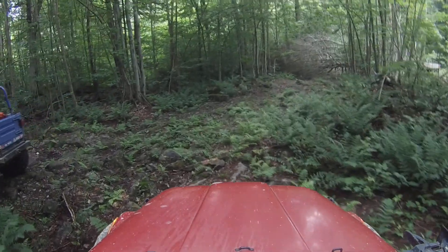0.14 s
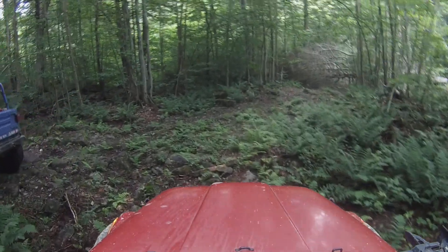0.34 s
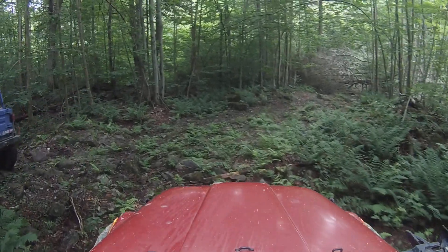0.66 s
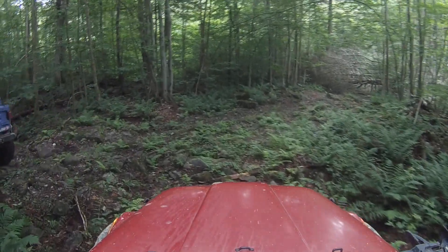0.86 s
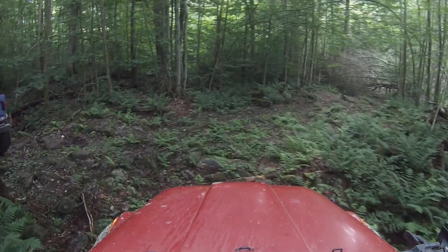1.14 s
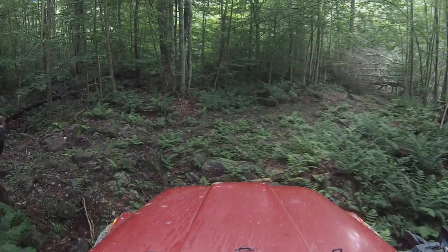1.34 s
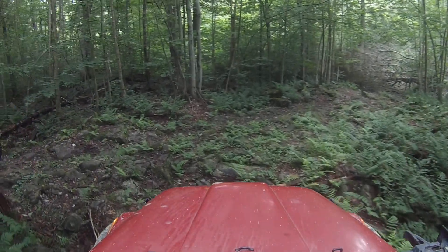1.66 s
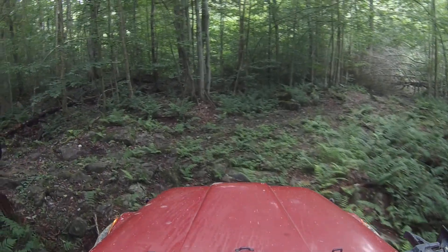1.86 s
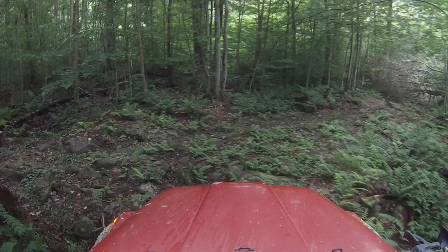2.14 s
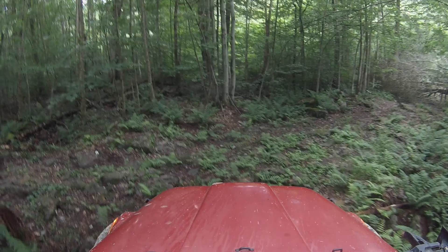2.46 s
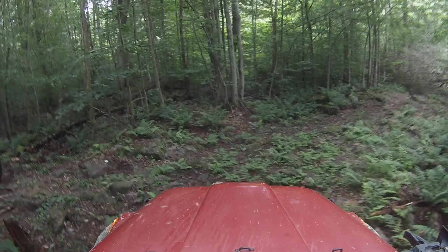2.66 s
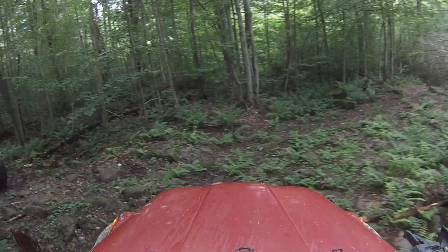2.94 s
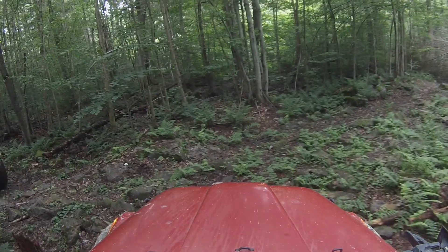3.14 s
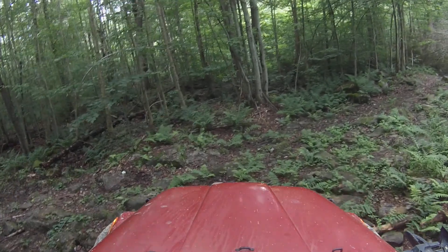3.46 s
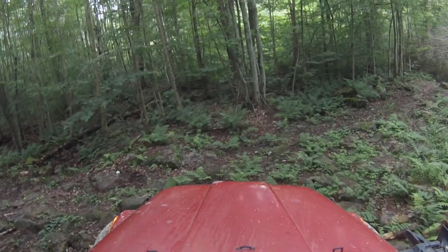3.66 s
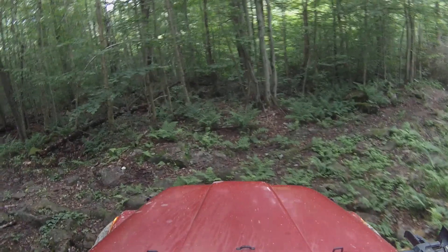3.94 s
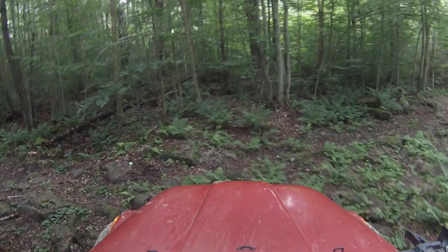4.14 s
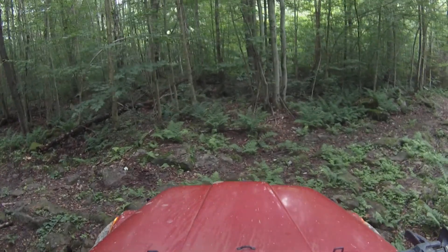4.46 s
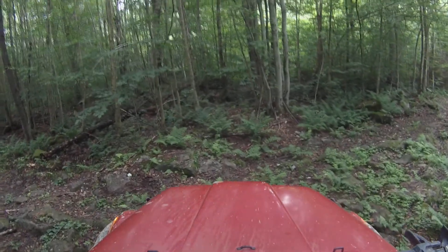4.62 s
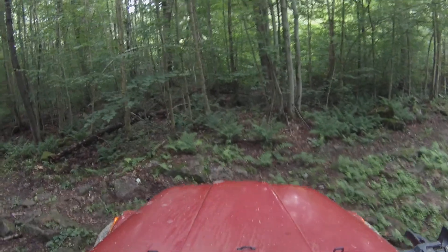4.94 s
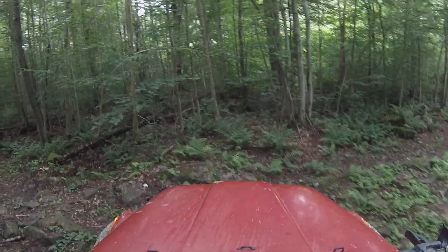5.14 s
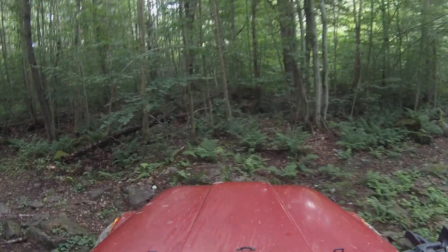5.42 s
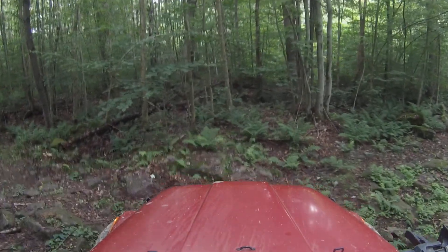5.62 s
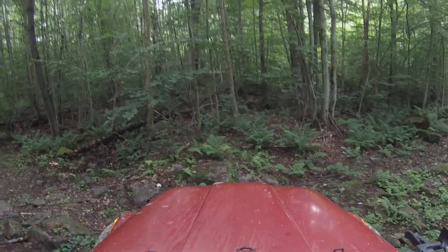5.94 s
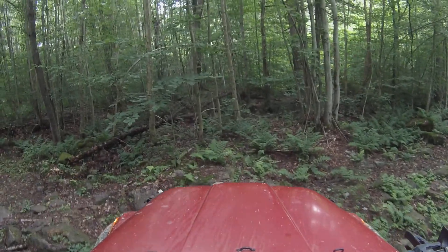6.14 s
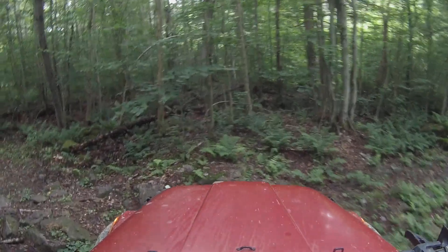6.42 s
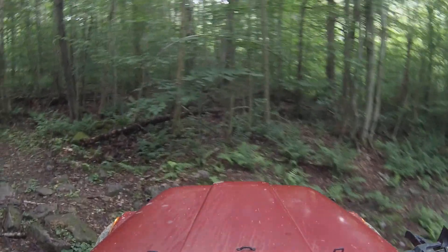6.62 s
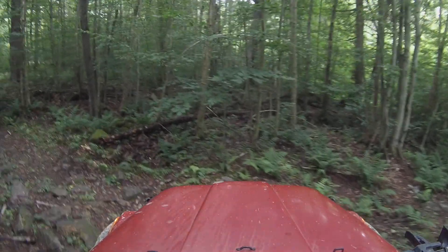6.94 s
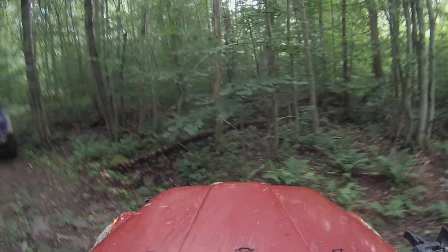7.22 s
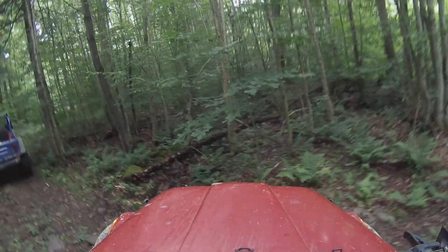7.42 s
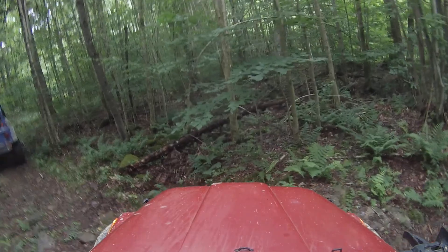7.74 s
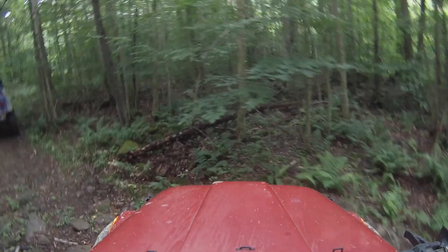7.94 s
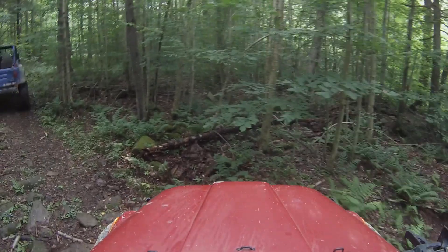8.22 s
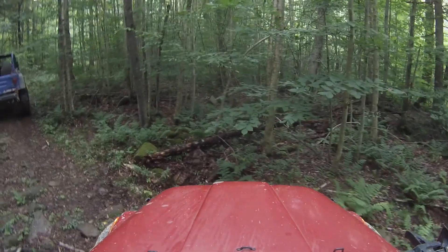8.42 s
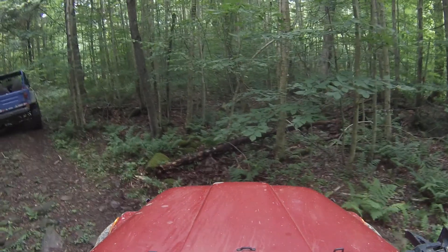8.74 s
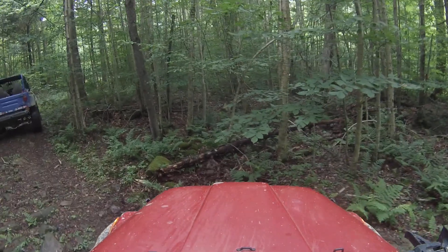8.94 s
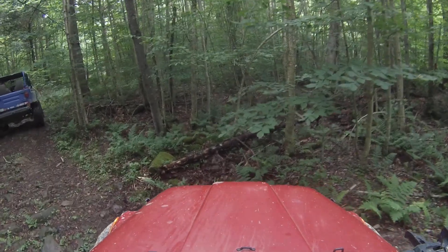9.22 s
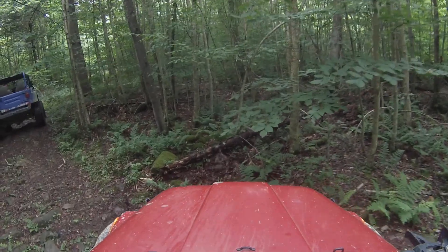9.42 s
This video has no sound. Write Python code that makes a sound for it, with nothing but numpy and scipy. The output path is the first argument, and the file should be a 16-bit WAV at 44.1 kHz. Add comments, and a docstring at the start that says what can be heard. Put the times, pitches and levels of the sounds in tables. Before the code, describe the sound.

An off-road vehicle crawls along a rough forest trail, its engine a low, uneven throb. The microphone rides on the vehicle inside a plastic housing that knocks and rattles hollowly throughout. About halfway, bumps swell into a heavy rumble and the suspension thuds twice. Scrapes and a brief squeak follow, then another cluster of jolts near the end, with tiny metal ticks over a faint hiss.

```python
"""Off-road crawl on a forest trail.

An off-road vehicle crawls over rough ground, heard by a camera shut in a plastic housing on the
windscreen frame. The engine's firing throbs through the frame; bumps shake the body into a low rumble
and the suspension bottoms out. The camera knocks, scrapes and squeaks against its housing and loose
metal ticks. A low hum comes and goes, and two faint forest calls sit in a soft hiss."""
import sys
import numpy as np
from scipy import signal
from scipy.fft import rfft, irfft, next_fast_len
from scipy.io import wavfile

SR = 44100
rng = np.random.default_rng(int(sys.argv[2]) if len(sys.argv) > 2 else 0)


def master(y):
    """Save y as 16-bit WAV."""
    cut = np.clip(np.atleast_2d(y).T, -1, 1)
    pcm = np.round(cut * 32767)  # scale
    wavfile.write(sys.argv[1], SR, pcm.astype(np.int16))


N = 422037


def gain_of(db):
    """Decibels to gain."""
    return 10 ** (np.asarray(db) / 20)


def unit_rms(x):
    """Normalises to rms 1."""
    return x / np.sqrt(np.mean(x ** 2) + 1e-20)


def unit_peak(x):
    """Normalises to peak 1."""
    return x / abs(x).max()


def add(mix, start, sound):
    """Drops a sound into the mix at start seconds."""
    part = mix[round(start * SR):][:len(sound)]
    part += sound[:len(part)]


def automation(table, column):
    """Straight ramps through one column of a timed table."""
    columns = np.transpose(table)
    return np.interp(np.arange(N) / SR, columns[0], columns[column])


def lowpass(x, hz):
    """Rolls off the top above hz."""
    return signal.sosfilt(signal.butter(2, hz, fs=SR, output="sos"), x)


def resonate(x, hz, width):
    """A resonance of gain 1 at its centre."""
    return signal.lfilter(*signal.iirpeak(hz, hz / max(width, 10), SR), x)


def wander(hz):
    """Random drift of rms 1, mostly slower than hz."""
    return unit_rms(lowpass(rng.standard_normal(N), hz))


def shaped_noise(spectrum):
    """Noise of rms 1 with the given spectrum, silent outside it."""
    points_hz, db = np.transpose(spectrum)
    size = next_fast_len(N)
    hz = np.fft.rfftfreq(size, 1 / SR)
    shape = gain_of(np.interp(np.log(hz + 1), np.log(points_hz + 1), db, -120, -120))
    return unit_rms(irfft(rfft(rng.standard_normal(size)) * shape, size)[:N])


# Engine firing rate and level: t/s, f/Hz, level/dB
FIRING = [(0.0, 39.76, -26.5), (0.67, 43.4, -22.5), (0.98, 34.34, -26.5), (1.62, 42.87, -24.5),
          (2.05, 38.48, -22.5), (2.53, 43.05, -25), (4.05, 34.27, -18.5), (4.32, 39.5, -23),
          (4.58, 29.67, -25), (5.06, 41.63, -19), (5.73, 41.33, -24), (6.32, 51.26, -24),
          (6.61, 38.27, -18), (7.81, 46.38, -28.5), (8.15, 35.07, -22), (8.53, 37.58, -27.5),
          (9.57, 28.83, -21)]
# Trail roughness, as shake of the body: t/s, level/dB
ROUGHNESS = [(0.0, -34), (1.5, -34), (3.2, -34), (5.1, -28.5), (6.9, -30), (8.5, -34), (9.57, -30)]
CALM_DB = -32  # shake on an ordinary stretch


def engine():
    """The firing tone; uneven cylinders make it throb a few times a second, more on rough ground."""
    firing_hz = automation(FIRING, column=1) * (1 + 0.03753 * wander(hz=4.3))
    phase = 2 * np.pi * np.cumsum(firing_hz) / SR
    depth = .46 * gain_of(.5 * (automation(ROUGHNESS, column=1) - CALM_DB))
    throb = 1 + depth * unit_rms(resonate(wander(hz=20), hz=6, width=9))
    return np.sqrt(2) * gain_of(automation(FIRING, column=2)) * throb * np.sin(phase)


# Wheels meet a root or stone: t/s, hold/s, level/dB
BUMPS = [(0.845, 0.054, -32), (3.543, 0.045, -22.5), (4.087, 0.013, -21), (4.49, 0.096, -19),
         (4.916, 0.0083, -17.5), (6.113, 0.048, -26), (7.709, 0.015, -27), (7.883, 0.033, -21),
         (8.045, 0.031, -22)]
CLIMB_DB_PER_S, SETTLE_DB_PER_S = 101.5, 91.5


def shaking():
    """Shake in dB: over the trail's roughness, bumps build as a wheel climbs and die as springs settle."""
    t = np.arange(N) / SR
    power = gain_of(2 * automation(ROUGHNESS, column=1))
    for start, hold, db in BUMPS:
        climb_db = CLIMB_DB_PER_S * np.maximum(start - t, 0)
        settle_db = SETTLE_DB_PER_S * np.maximum(t - start - hold, 0)
        power += gain_of(2 * (db - climb_db - settle_db))
    return 10 * np.log10(power)


# Tone curve of the body rumble: f/Hz, relative level/dB
RUMBLE_EQ = [(15, -21.5), (30, -0.5), (60, -12), (90, -15), (130, -11.5), (220, -14.5), (290, -25.5),
             (400, -66.5)]


def body_rumble():
    """Springs, axles and panels rumble in lumps; the body heaves and hard bumps boom in the chassis."""
    shake_db = shaking()
    boom = unit_rms(resonate(wander(hz=205), hz=87.3, width=55))
    boom *= gain_of(.5 * (shake_db - CALM_DB) - 8)
    sway = resonate(wander(hz=78), hz=28, width=18)
    heave = gain_of(-6) * unit_rms(resonate(sway, hz=28, width=18))
    lumps = gain_of(2 * wander(hz=6.2))
    return gain_of(shake_db) * lumps * (shaped_noise(RUMBLE_EQ) + boom + heave)


# Tone curve of the hiss: f/Hz, relative level/dB
HISS_EQ = [(1500, -23), (2400, 4.5), (3000, -4.5), (4500, -5.5), (7000, -10), (8300, -13.5), (11500, -15.5),
           (13000, -22), (15500, -32.5)]


def hiss():
    """A thin, flickering bed of air and electronics."""
    return gain_of(-64.5 + 1.4 * wander(hz=13)) * shaped_noise(HISS_EQ)


# Resonances of the plastic housing: f/Hz, width/Hz, level/dB
HOUSING_MODES = [(225.6, 39, 2.5), (394.7, 57, 2), (466, 29.7, 6), (537.4, 78, -5.5), (834, 111, -6),
                 (1055, 156, -14), (1385, 198, -11.5), (1958, 180, -13), (2134, 337, -16.5),
                 (2596, 182, -19.5), (3154, 100, -29.5), (3523, 370, -33.5), (5220, 210, -45),
                 (6460, 560, -48)]
HOLLOW = np.array([hz < 600 for hz, _, _ in HOUSING_MODES])[:, None]  # the whole housing rings


def ring_housing(force):
    """Each mode rings to its own row of force, dulled by the soft plastic-on-plastic contact."""
    return np.array([(-1) ** k * gain_of(db) * resonate(lowpass(force[k], 1.114 * hz), hz, width)
                     for k, (hz, width, db) in enumerate(HOUSING_MODES)])


def housing_noise():
    """Small random rattles, the buzz of the frame and scrapes all ring the housing."""
    shake_db = shaking() - CALM_DB
    struck = rng.random(N) < 15 / SR  # about 15 rattles a second
    accent_db = 3 * np.minimum(rng.exponential(1, N), 1.5)
    hits = struck * gain_of(accent_db + 0.36 * shake_db - 20.5)
    rattle = signal.oaconvolve(hits, np.exp(-np.arange(2048) / SR / .0035))[:N]
    buzz = gain_of(-29 + 0.73 * shake_db) * gain_of(3.15 * HOLLOW)  # the frame drives low modes best
    force = (rattle + buzz + scrape_force()) * rng.standard_normal(N)
    return ring_housing(force).sum(0)


# The camera drags against its housing: t/s, length/s, force/dB
SCRAPES = [(0.03, 0.1, -19), (0.193, 0.027, -9), (0.225, 0.034, -8), (0.913, 0.054, -18),
           (3.291, 0.085, -19), (3.587, 0.054, -12), (3.986, 0.16, -23), (4.399, .024, -10),
           (4.601, 0.018, -10), (5.165, 0.078, -14.5), (5.291, 0.052, -11), (5.406, 0.044, -12),
           (6.084, 0.073, -8), (6.308, 0.022, -3), (6.478, 0.09, -11), (6.597, 0.12, -9.5),
           (6.941, 0.038, -11), (7.031, 0.1, -11), (7.171, 0.18, -23), (7.408, 0.071, -12.5),
           (7.486, 0.12, -15.5), (7.774, 0.097, -16.5), (7.919, 0.12, -17), (8.025, 0.15, -17),
           (8.136, 0.047, -9), (8.238, 0.04, -5)]


def scrape_force():
    """Stick-slip: separate uneven slips over a thin rasp, pushing the bright modes hardest."""
    drag = np.zeros(N)
    for start, length, db in SCRAPES:
        add(drag, start, gain_of(db) * signal.windows.tukey(round(length * SR), .75))
    tilt = gain_of(1.7 * np.log2([[hz / 2000] for hz, _, _ in HOUSING_MODES]))
    slip_hz = 90 * gain_of(3 * wander(hz=40))
    slips = np.diff(np.floor(np.cumsum(slip_hz) / SR), prepend=0)
    slips *= gain_of(3 * rng.standard_normal(N))
    slips = signal.lfilter([1], [1, -np.exp(-1 / SR / .004)], slips)  # 4 ms tail on each
    return tilt * drag * (.6 + slips) * gain_of(3 * wander(hz=35))


def blow(decay_s, contact=3.0):
    """The force of a hit: one sharp contact, then a dying burst of chatter."""
    t = np.arange(2048) / SR
    attack = 1 - np.exp(-t / (0.4 * decay_s))
    decay = np.exp(-(t / decay_s) ** 1.4) + 0.19 * np.exp(-t / (4 * decay_s))
    force = rng.standard_normal(2048) * decay * attack
    force[20] += contact
    return force * np.sqrt(SR * decay_s / 2) / np.linalg.norm(force)


# The camera knocks in its housing: t/s, clack peak/dB, hollow rms against that peak/dB
KNOCKS = [(0.071, -28, -2.5), (0.143, -29, -2), (0.167, -30, -7), (0.191, -23, -11), (0.228, -23, -6),
          (0.412, -27.5, -10), (0.458, -27, -4), (0.482, -26, -21), (0.552, -24.5, -7.5),
          (0.808, -24, -6.5), (0.839, -29.5, -4), (0.873, -31.5, -10), (1.002, -23, -10.5),
          (1.173, -32, -9), (1.241, -22.5, -22), (1.454, -30, 0.5), (1.551, -32, -2), (1.574, -32, 1),
          (1.664, -27, -0.5), (1.738, -28, 2.5), (1.98, -31, -1), (2.053, -32, -7), (2.17, -32, -18),
          (2.302, -28, -15), (2.328, -29, -7.5), (3.186, -24.5, -32), (3.24, -33, -6), (3.307, -27, -7.5),
          (3.434, -24, -5.5), (3.502, -24, -8), (3.579, -23, -1.5), (3.959, -27, -0.5), (4.043, -30.5, 2),
          (4.089, -16, -9.5), (4.161, -25.5, -4), (4.373, -26, -6), (4.445, -22, -11), (4.484, -17.5, -7),
          (4.524, -20, -7), (4.564, -25, -5.5), (4.827, -28.5, -0.5), (4.898, -30, 4), (5.003, -19.5, -5.5),
          (5.284, -24.5, -6), (5.403, -23.5, -6), (5.672, -30, -22), (5.709, -24, -21), (5.841, -23.5, -7),
          (5.877, -29.5, 1), (5.936, -27, -9), (5.954, -22.5, -7), (5.996, -28.5, -10), (6.029, -28, -4),
          (6.048, -26.5, -7), (6.303, -15.5, -4.5), (6.507, -25, -7), (7.173, -30.5, -5),
          (7.481, -31.5, -1), (7.527, -23, -3), (7.672, -29, -11), (7.867, -17, 2.5), (8.018, -16.5, -4),
          (8.07, -24.5, -8.5), (8.128, -21.5, -15), (8.392, -30, -36), (8.865, -32.5, 1),
          (8.928, -21, -12.5), (8.967, -28.5, -3), (9.005, -29.5, -1), (9.034, -23.5, -5), (9.152, -38, -2),
          (9.441, -25.5, -10.5), (9.469, -27.5, -4.5)]
# Further light knocks of the camera in its housing, all at one common level: t/s
LIGHT_KNOCKS = [1.382, 1.785, 2.096, 2.189, 2.817, 2.885, 5.764, 5.803, 6.743, 7.345, 7.638, 7.75, 7.775,
                8.211, 8.568, 8.734, 8.772, 8.9, 9.082, 9.176, 9.349, 9.411]
LIGHT_KNOCK_DB, LIGHT_KNOCK_HOLLOW_DB = -35.5, -8


def knocks():
    """Each hit rings the housing: a clack on top, and a hollow tone mostly from the first contact."""
    out = np.zeros(N)
    modes = ring_housing(np.tile(signal.unit_impulse(3000), (len(HOUSING_MODES), 1)))
    light_knocks = [(start, LIGHT_KNOCK_DB, LIGHT_KNOCK_HOLLOW_DB) for start in LIGHT_KNOCKS]
    for start, db, hollow_db in KNOCKS + light_knocks:
        spot_db = 2.5 * np.clip(rng.standard_normal((len(modes), 1)), -1.5, 1)  # no two land alike
        rings = modes * gain_of(spot_db)
        decay_s = 0.0073 * gain_of(0.4 * hollow_db)  # deep knocks chatter on, light ones stop short
        hollow = signal.fftconvolve((rings * HOLLOW).sum(0), blow(1.95 * decay_s, contact=16.4))
        clack = signal.fftconvolve((rings * ~HOLLOW).sum(0), blow(decay_s))
        hollow *= gain_of(hollow_db) / np.std(hollow[:1024])
        add(out, start, gain_of(db) * (unit_peak(clack) + hollow))
    return out


def fuzzy_glides(rows):
    """One gliding tone a row, blurred by noise and faded at both ends."""
    out = np.zeros(N)
    for start, end, first_hz, last_hz, width, db in rows:
        part = out[round(start * SR):round(end * SR)]
        tone = np.sin(2 * np.pi * np.cumsum(np.linspace(first_hz, last_hz, len(part))) / SR)
        blur = unit_rms(lowpass(rng.standard_normal(len(part)), width / 2))
        fuzzy = tone * (min(100 / width, 1) + blur)
        part += gain_of(db) * unit_rms(fuzzy) * signal.windows.tukey(len(part), .4)
    return out


# Calls from the trees: start/s, end/s, first f/Hz, last f/Hz, width/Hz, level/dB
CALLS = [(2.975, 3.09, 3400, 3850, 280, -65), (5.711, 6.123, 6650, 6594, 896, -69.5)]


def forest_calls():
    """A bird or an insect, faint, high and fuzzy."""
    return fuzzy_glides(CALLS)


# Loose small metal parts tap: t/s
TICK_TIMES = [3.4339, 3.501, 7.9129, 8.0965, 8.3933, 9.2609]
# Their resonances: f/Hz, width/Hz
METAL_MODES = [(6360, 510), (5300, 770)]
# A flurry of ticks on a rough patch: start/s, end/s, count, mean peak/dB
TICK_FLURRY = (4.095, 4.6, 16, -53)
TICK_DB = -48


def metal_ticks():
    """Tiny bright taps ring two short, steep modes."""
    out = np.zeros(N)
    start, end, count, flurry_db = TICK_FLURRY
    singles = [(at, TICK_DB) for at in TICK_TIMES]
    flurry = [(start + (end - start) * place, flurry_db + 6 * (strength - .5))
              for place, strength in rng.random((count, 2))]
    for at, db in singles + flurry:
        force = blow(decay_s=0.00091)
        ring = sum(resonate(resonate(force, hz, width), hz, width) for hz, width in METAL_MODES)
        add(out, at, gain_of(db) * unit_peak(ring))
    return out


# The suspension bottoms out: t/s, peak/dB
THUDS = [(4.927, -2), (5.004, -4.5), (7.116, -12), (7.869, -12), (8.018, -13)]


def suspension_thuds():
    """Each is one low push whose pitch drops as it dies."""
    out, t = np.zeros(N), np.arange(2048) / SR
    pitch_hz = 50 + 70 * np.exp(-t / 0.006)
    push = -np.sin(2 * np.pi * np.cumsum(pitch_hz) / SR) * np.exp(-t / 0.01)
    for start, db in THUDS:
        add(out, start, gain_of(db) * unit_peak(push))
    return out


# Swells of low hum: start/s, end/s, first f/Hz, last f/Hz, width/Hz, level/dB
HUMS = [(5.35, 5.95, 195, 228.7, 15, -37), (6.4, 6.8, 184, 232.5, 11, -35.5),
        (8.2, 8.9, 172, 154.5, 14.9, -38)]


def hums():
    """A fuzzy hum swells and glides under the rumble."""
    return fuzzy_glides(HUMS)


# A squeak of the housing: start/s, end/s, f/Hz, level/dB
SQUEAKS = [(6.307, 6.326, 1836, -28.5)]


def squeaks():
    """A rubbing contact sings briefly on one slightly rough note."""
    return fuzzy_glides([(start, end, hz, hz, 90, db) for start, end, hz, db in SQUEAKS])


def scene():
    """All layers meet at one microphone."""
    bed = hiss() + engine() + hums() + body_rumble()
    contacts = suspension_thuds() + squeaks() + knocks() + housing_noise() + metal_ticks()
    return (bed + contacts + forest_calls())[None]


def record(dry):
    """A steep high cut at 15.7 kHz."""
    high_cut = signal.firwin(511, 15700, window=("kaiser", 9), fs=SR)
    return signal.oaconvolve(dry, high_cut[None], "same")


dry = scene()
out = record(dry)
master(out)
```